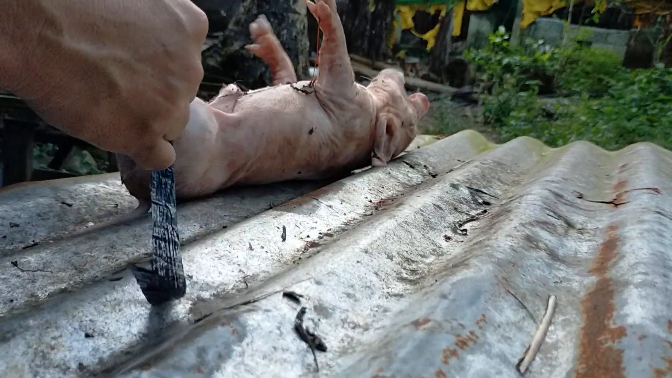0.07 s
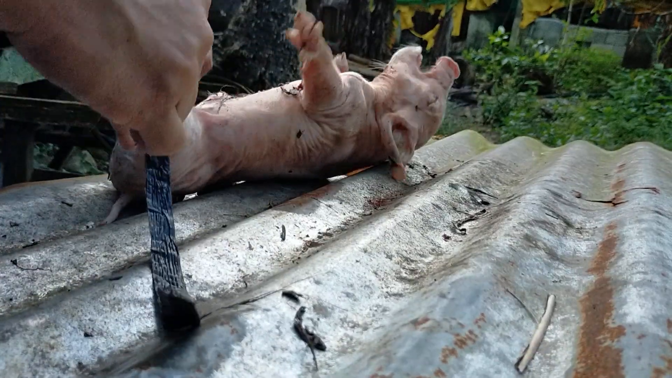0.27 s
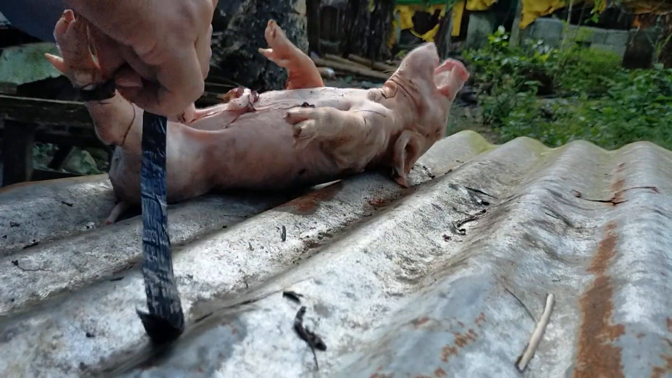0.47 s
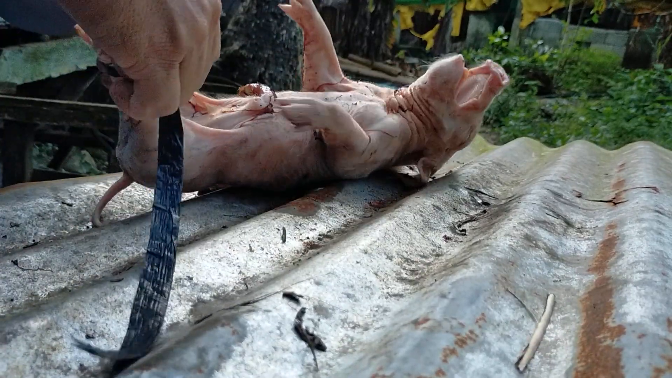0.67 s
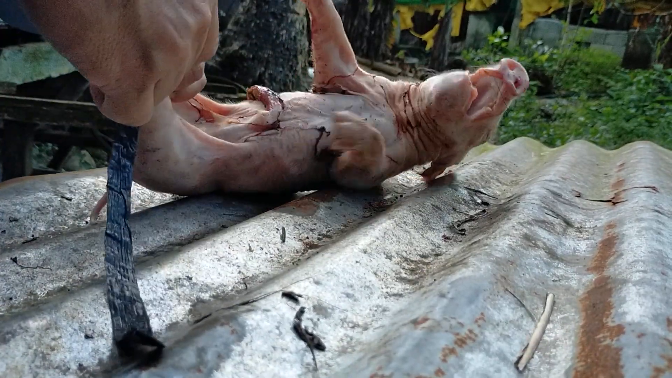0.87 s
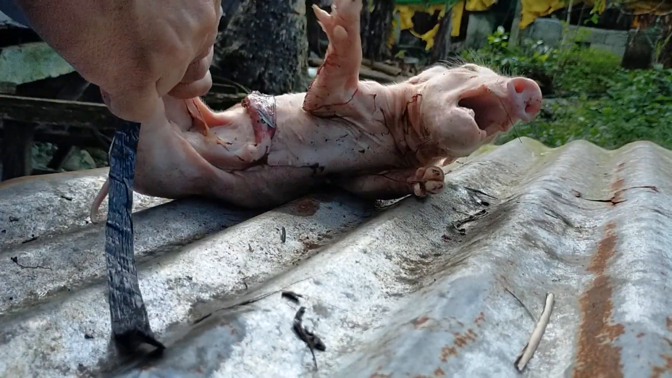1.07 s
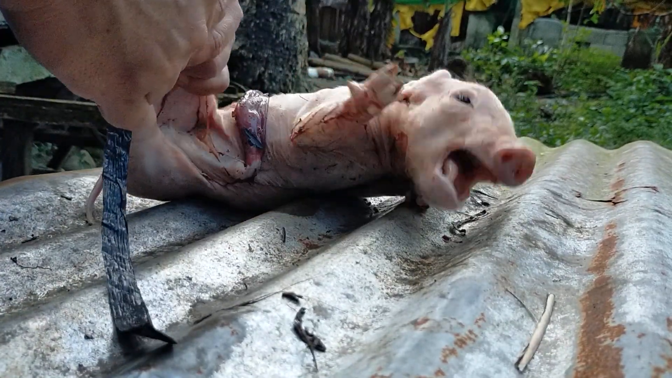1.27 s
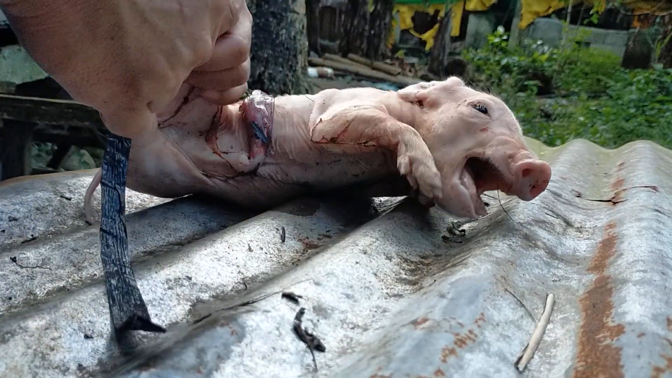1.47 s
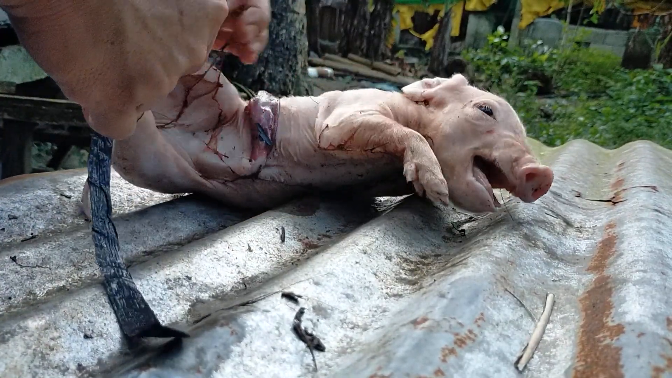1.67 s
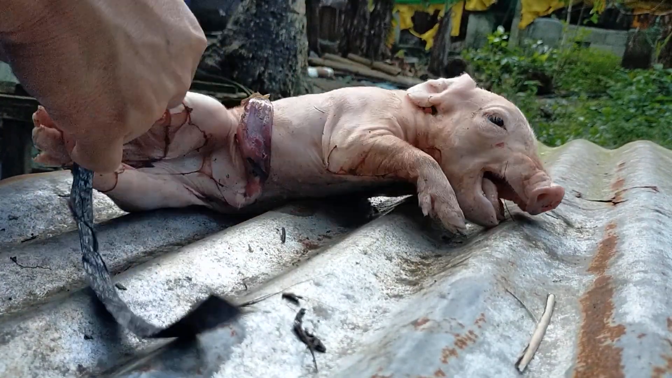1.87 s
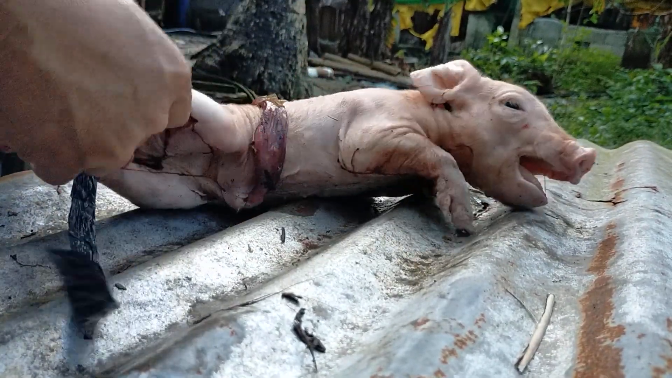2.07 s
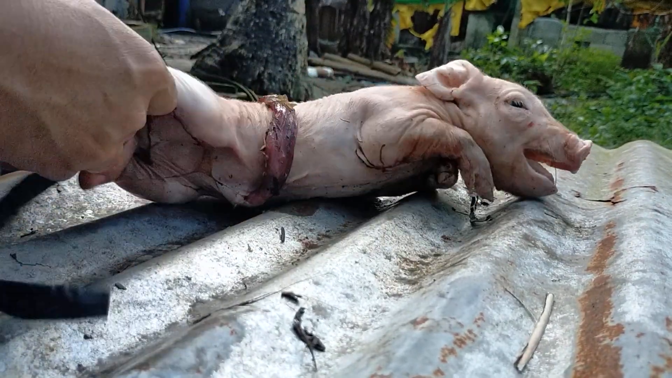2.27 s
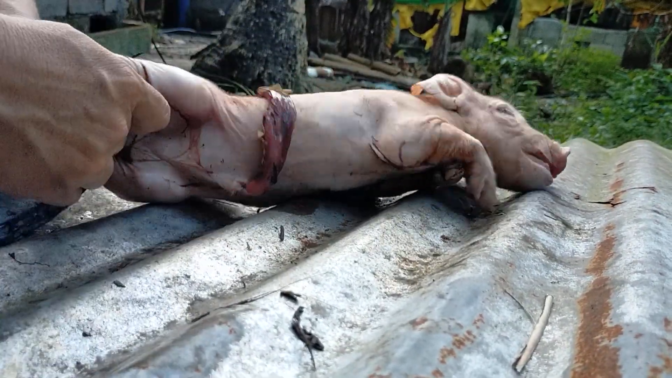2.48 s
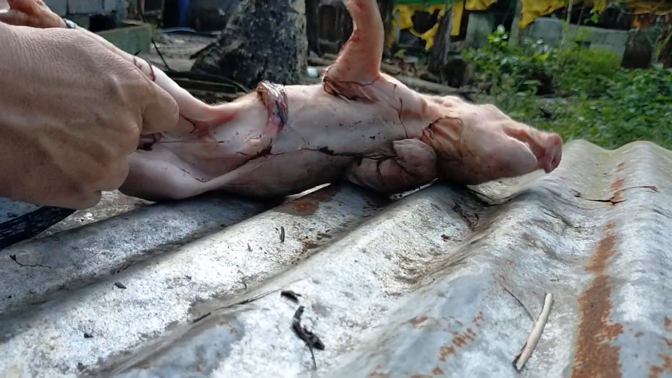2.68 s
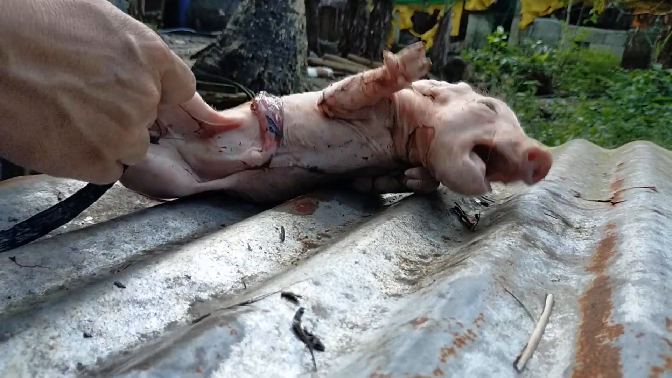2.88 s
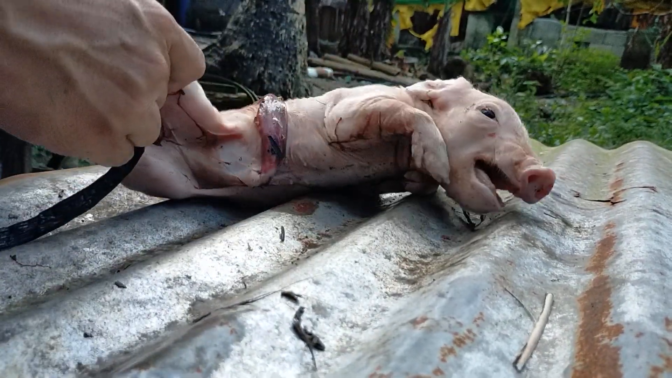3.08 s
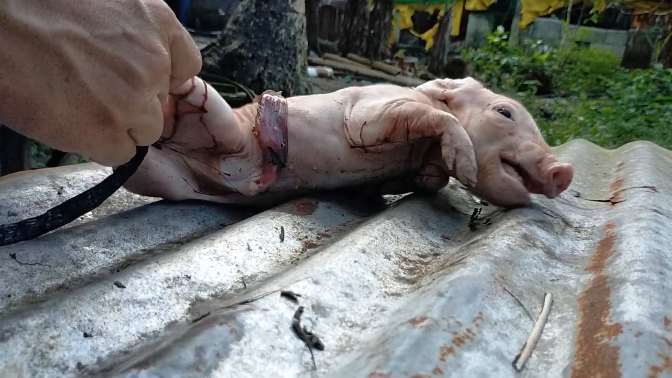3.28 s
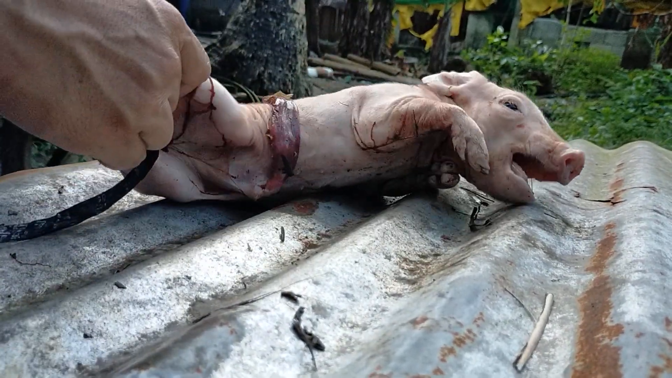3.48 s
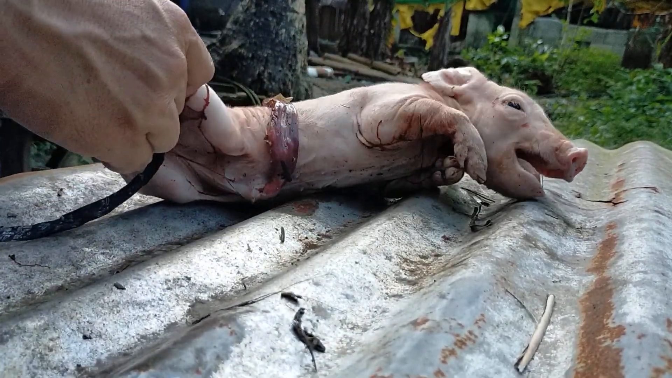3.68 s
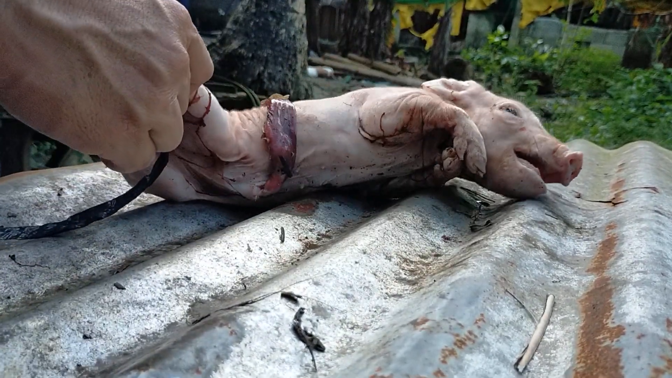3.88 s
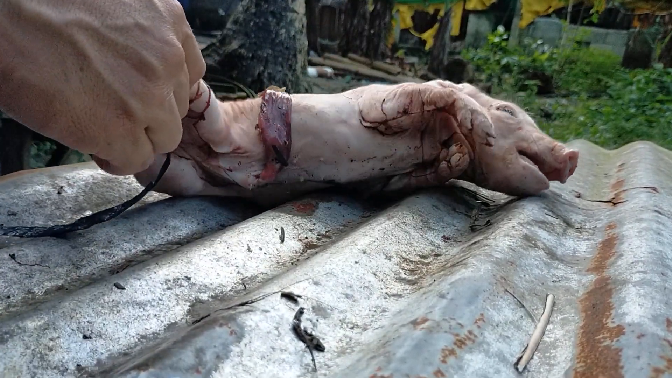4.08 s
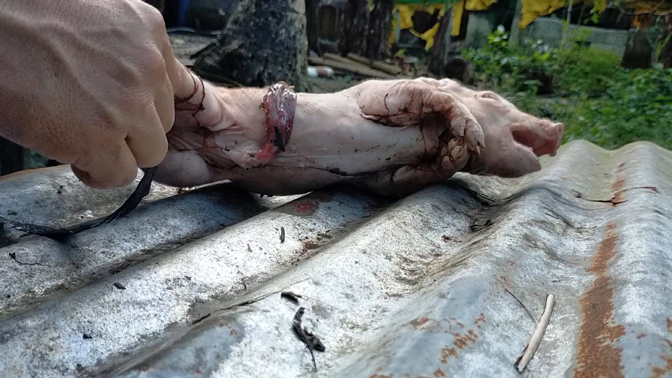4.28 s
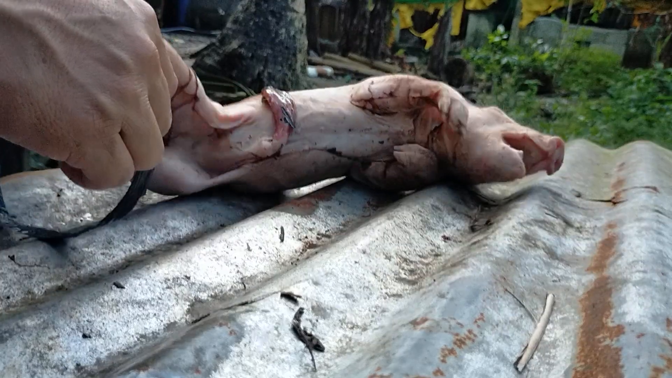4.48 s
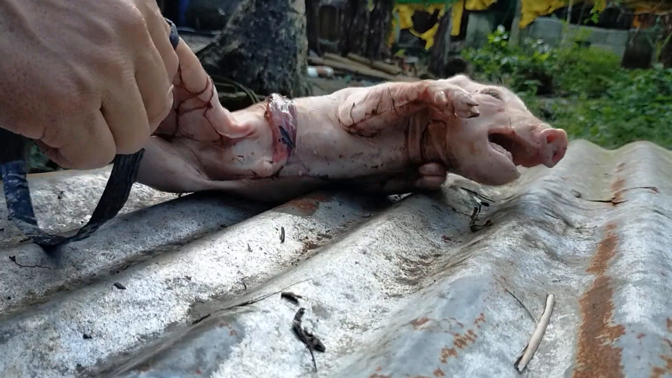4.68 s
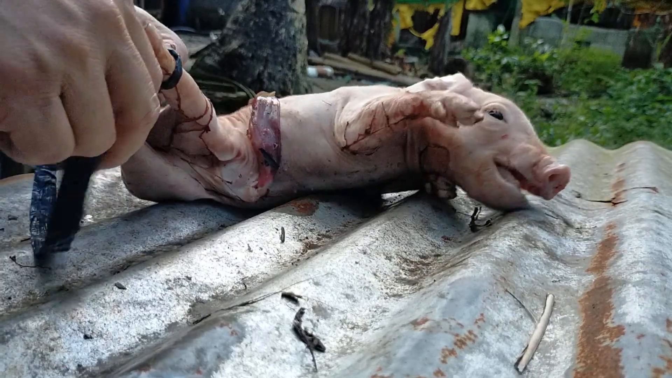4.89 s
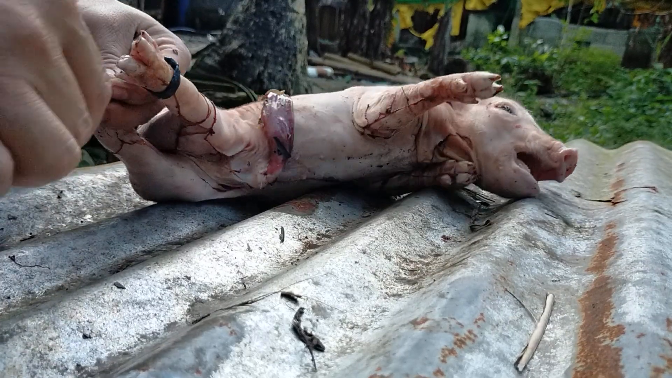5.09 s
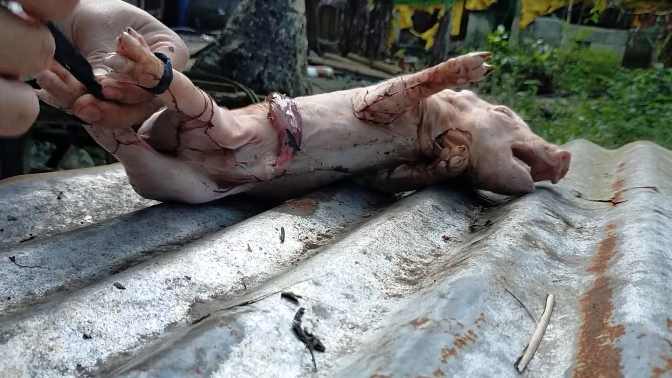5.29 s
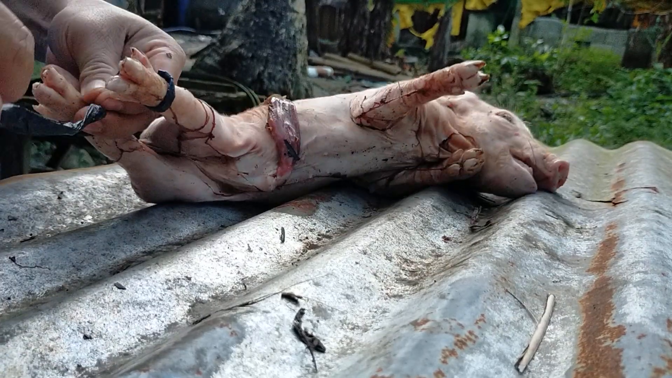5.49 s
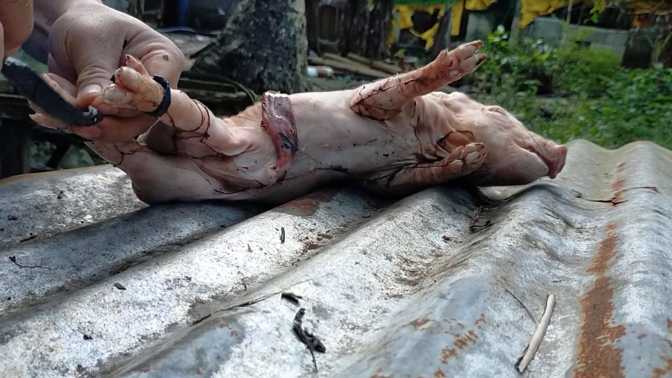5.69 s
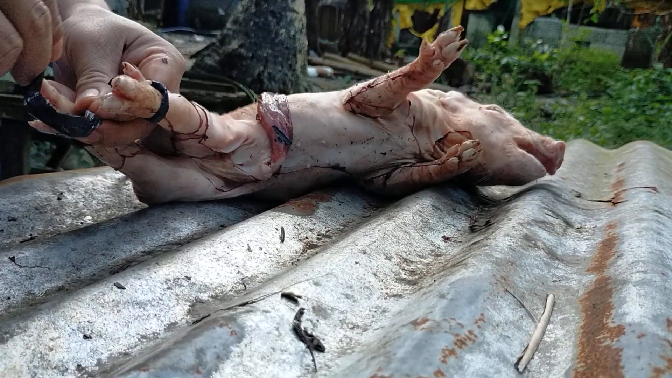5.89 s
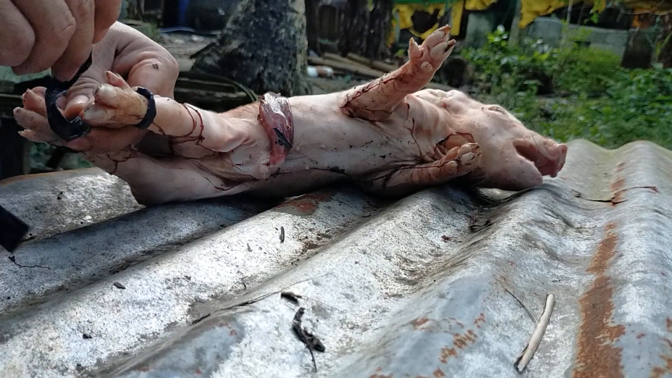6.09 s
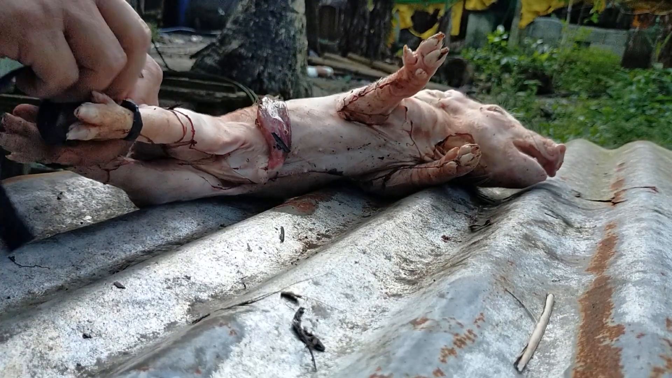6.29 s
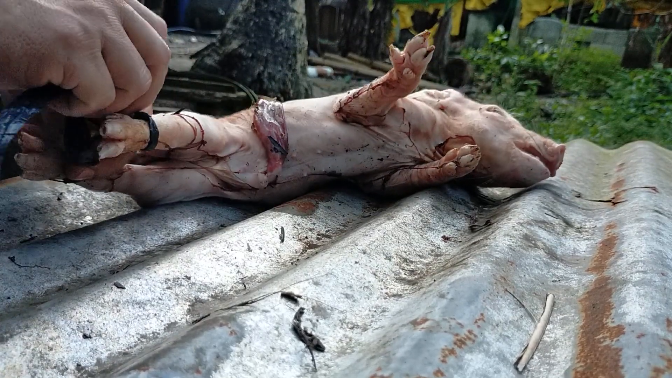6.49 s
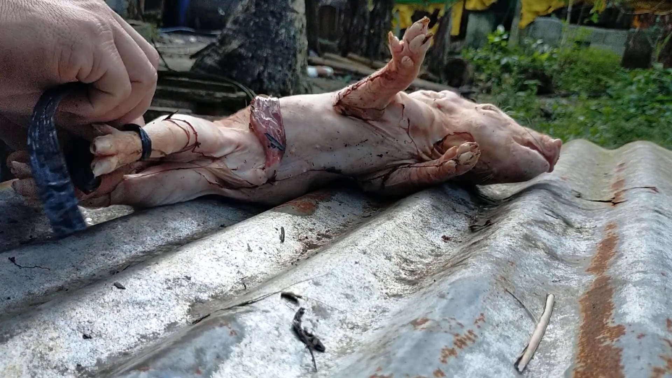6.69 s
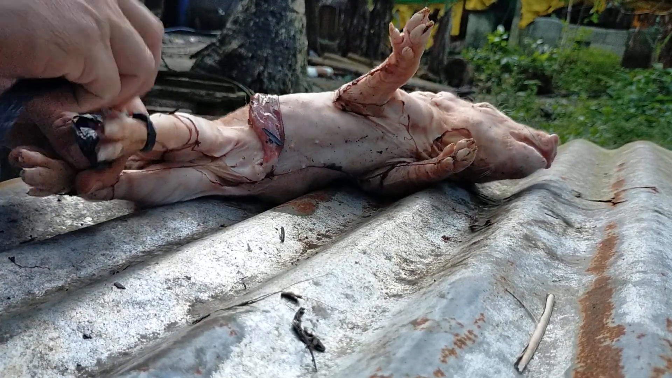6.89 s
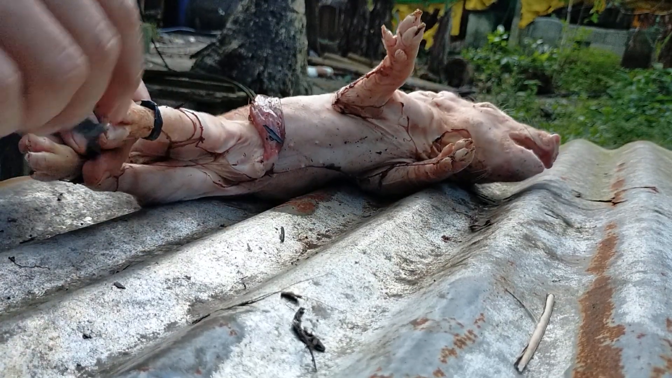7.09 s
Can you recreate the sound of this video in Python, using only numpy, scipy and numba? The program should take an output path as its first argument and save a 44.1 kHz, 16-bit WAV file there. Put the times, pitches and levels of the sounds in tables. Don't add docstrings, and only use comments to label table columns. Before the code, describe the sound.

Very close to the microphone outdoors, a small piglet screams in short repeated bursts, each starting as a low creak, rising to a nasal piercing squeal and sometimes breaking into harsh hiss. Breathy gasps fall between. Dull thumps on a corrugated metal sheet and crisp tape crackles accompany the struggle. Later squeals are quieter and tired. Insects and light wind stay faint.

```python
import sys
import numpy as np
from scipy import signal
from scipy.fft import rfft, irfft
from scipy.io import wavfile
from scipy.ndimage import uniform_filter1d
from numba import njit

SR = 44100
rng = np.random.default_rng(int(sys.argv[2]) if len(sys.argv) > 2 else 0)


def master_out(mix):
    frames = np.transpose(np.atleast_2d(mix))
    ceiling = np.clip(frames, -1, 1)
    pcm = np.round(ceiling * 32767).astype(np.int16)
    wavfile.write(sys.argv[1], SR, pcm)


def voltage_ratio(decibels):
    exponent = np.asarray(decibels, float) / 20
    return 10 ** exponent


N = 314874


def rms_one(x):
    return x / np.sqrt(np.mean(x ** 2) + 1e-20)


def filtered(x, order, hz, kind="low"):
    return signal.sosfilt(signal.butter(order, hz, kind, fs=SR, output="sos"), x)


def in_time(rows):
    s, *columns = np.transpose(rows)
    return [np.interp(np.arange(N) / SR, s, column) for column in columns]


def drift(rate_hz):
    r = np.exp(-2 * np.pi * rate_hz / SR)
    return rms_one(signal.lfilter([1], [1, -2 * r, r * r], rng.standard_normal(N + SR))[SR:])


@njit
def glide(x, cosine, r):
    y = np.zeros(len(x))
    for i in range(2, len(x)):
        drive = (1 - r[i] ** 2) / 2 * (x[i] - x[i - 2])
        y[i] = drive + 2 * r[i] * cosine[i] * y[i - 1] - r[i] ** 2 * y[i - 2]
    return y


def resonance(x, hz, width_hz):
    one = np.ones(N)
    return glide(x, one * np.cos(2 * np.pi * hz / SR), one * np.exp(-np.pi * width_hz / SR))


def modes(x, table, shift_hz=0):
    total = 0
    for hz, width_hz, db in table:
        once = resonance(x, hz + shift_hz, width_hz)
        total = total + voltage_ratio(db) * resonance(once, hz + shift_hz, 2 * width_hz)
    return total


def evened(x, span_s=0.024):
    size = int(span_s * SR)
    power = uniform_filter1d(uniform_filter1d(x ** 2, size), size)
    return x / np.sqrt(power + 1e-14)


# time in seconds, slaps per second, throat resonance in Hz, level in dB,
# roughness 0-1.
FADING = [(-.01, 96, 1760, -26, 0.48), (.07, 95, 2010, -48, 0.51), (.11, 95, 2170, -59, .6)]
LONG = [(.338, 102.8, 1907, -33.5, 0.45), (0.411, 107.8, 1836, -26.5, 0.095),
        (.46, 137.5, 1876, -14.5, 0.016), (.546, 195.4, 2025, -15, 0.11), (.614, 193.4, 2145, -19, 0.35),
        (.683, 183.6, 2170, -21.5, 0.35), (.75, 191.8, 2200, -13, 0.37), (.795, 215.2, 2100, -16, .25),
        (.815, 230, 2000, -19, 0.27)]
BREAKING = [(1.185, 85.24, 1814, -34.5, 0.17), (1.247, 93.05, 1800, -21, .15),
            (1.314, 162.8, 2035, -15, 0.035), (1.35, 192.4, 2170, -18, 0.19),
            (1.38, 200.3, 2170, -22.5, 0.59), (1.49, 221.5, 2418, -25.5, .7),
            (1.534, 187.2, 2262, -16.5, 0.32), (1.565, 169.7, 1947, -26, 0.11), (1.6, 150.4, 2000, -78, .7)]
HOARSE = [(1.872, 77.8, 1770, -41.5, .4), (1.939, 98.23, 1744, -24, .18), (2.01, 128, 1764, -19, .1),
          (2.06, 180.3, 2170, -16.5, .28), (2.11, 245.3, 2313, -22.5, .78), (2.229, 230, 2120, -31, .89),
          (2.359, 238.2, 2330, -29, .7), (2.408, 173.7, 2195, -22.5, .3), (2.434, 140, 1710, -28, .18)]
SHORT = [(2.695, 97.26, 1750, -41, 0.34), (2.77, 76.7, 1902, -27, .2), (2.814, 137.3, 2012, -18, 0.088),
         (2.876, 151.1, 2018, -16.5, .15), (2.939, 209.4, 2160, -18, 0.39), (2.97, 180, 2050, -12.5, 0.097),
         (3.0, 156.3, 2146, -46, 0.58), (3.03, 149.4, 2150, -76, .8)]
PEAKING = [(3.289, 62.7, 1260, -44.5, .15), (3.364, 87.95, 1436, -27.5, .2), (3.42, 103.8, 1636, -25.5, .2),
           (3.52, 115.5, 1843, -24, .15), (3.56, 127, 1938, -19, 0.058), (3.595, 160.1, 2100, -8, 0.014),
           (3.636, 114.4, 1831, -28.5, .1), (3.671, 103, 2120, -45, .8), (3.735, 119.1, 2113, -62.5, 0.96)]
SHRILL = [(4.068, 65, 1498, -43, .15), (4.21, 115.1, 1761, -21.5, 0.099), (4.3, 109.7, 1830, -22.5, 0.11),
          (4.349, 164.2, 2205, -14, 0.058), (4.42, 218.7, 2616, -20, 0.64), (4.5, 230, 2789, -25.5, 0.78),
          (4.52, 167.3, 2490, -5.5, 0.33), (4.545, 218.8, 1994, -27, 0.091), (4.62, 148.8, 2020, -89, .8)]
CREAKY = [(4.91, 74.93, 496.6, -70, .7), (4.97, 79.7, 1250, -47.5, .75), (5.0, 80.15, 1479, -37, .5),
          (5.011, 80, 1546, -25.5, .08), (5.09, 103.8, 1619, -23.5, .13), (5.161, 97.13, 1710, -29.5, .5),
          (5.214, 107.1, 1827, -23.5, 0.16), (5.28, 118, 1892, -33.5, .55), (5.39, 113, 2540, -54.5, 0.97)]
TIRED = [(5.836, 76.4, 1420, -28.5, .2), (5.903, 103.3, 1557, -26, .1), (5.977, 86.66, 1549, -28.5, 0.21),
         (6.05, 120.4, 1850, -30, 0.27), (6.123, 111.1, 1700, -34.5, .3), (6.197, 79.26, 1950, -34.5, 0.18),
         (6.286, 72.9, 1897, -51.5, 0.92)]
LAST = [(6.849, 58.94, 1374, -40, 0.44), (6.928, 81.9, 1510, -34.5, 0.14), (6.995, 121.7, 1760, -35.5, .15),
        (7.043, 125, 1809, -30.5, .15), (7.06, 146.5, 1970, -22.5, 0.085), (7.101, 145.4, 2012, -28, .12),
        (7.2, 144.1, 2030, -22, .15)]
SQUEALS = [
    FADING,
    LONG,
    BREAKING,
    HOARSE,
    SHORT,
    PEAKING,
    SHRILL,
    CREAKY,
    TIRED,
    LAST,
]
# open second resonance over first, second resonance in dB, mouth hiss in dB,
# teeth hiss in dB, chest grunt in dB.
COLOURS = [(2.9, 6.5, -4, -7, -46), (2.02, -5.5, 5.5, -2, -41), (1.636, -3, 6.5, 3, -44),
           (1.693, -0.5, 2.5, 2, -38), (2.045, -5.5, 3, 0, -46.5), (1.915, -0.5, -4.5, -3, -43),
           (1.976, -1.5, 1, -5, -44.5), (2.194, -4, -25, -6.5, -41.5), (2.112, -4, -3, -5.5, -44),
           (1.97, -3, -4, -8, -44)]
# start in seconds, end in seconds, level in dB, throat resonance in Hz, chest grunt in dB.
GASPS = [
    (.818, 0.896, -43, 2300, -47.5),
    (0.996, 1.17, -48, 2196, -45),
    (5.606, 5.833, -53, 2870, -44),
    (6.29, 6.515, -50.5, 2740, -44.5),
    (6.672, 6.799, -59, 1498, -52.5),
]


def breaths():
    slaps_per_s, rough, fade_db, ratio, second_db, hiss_db = 65, .85, 8.5, 0.47, 3, -4.5
    calls = [*zip(SQUEALS, COLOURS)]
    for start, end, db, hz, chest_db in GASPS:
        curve = [(start, slaps_per_s, hz, db, rough), (end, slaps_per_s, hz, db - fade_db, rough)]
        calls.append((curve, (ratio, second_db, hiss_db, hiss_db, chest_db)))
    calls.sort(key=lambda call: call[0][0][0])
    spans = np.array([(curve[0][0], curve[-1][0], *colour) for curve, colour in calls])
    current = np.maximum(np.searchsorted(spans[:, 0], np.arange(N) / SR) - 1, 0)
    return in_time(sorted(row for curve, _ in calls for row in curve)), spans[current].T


def throat(opening, open_hz, level_db, rough):
    tight_hz, slack_hz, tight_db, widen_hz_per_db, chaos_widen_hz = 88, 268.5, -15.5, 23, 230
    second_shut_hz, chaos_sag_hz, knee_db = 2220, 302, -20.5
    chaos = np.clip(2 * rough - .6, 0, 1)
    loud_db = np.maximum(level_db - knee_db, 0)
    second_hz = second_shut_hz + np.clip(opening, 0, 1) * (open_hz - chaos_sag_hz * chaos - second_shut_hz)
    width_hz = np.clip(tight_hz + widen_hz_per_db * (tight_db - level_db), tight_hz, slack_hz)
    width_hz = width_hz + chaos_widen_hz * chaos
    shut_db = -24.5 * np.exp(-(opening / 0.27) ** 2)
    second_db = -7.5 - loud_db + 8.5 * rough + shut_db
    mouth_db = -26.5 + 31 * rough
    teeth_db = -20 + 25.5 * rough - 0.92 * loud_db
    return second_hz, width_hz, second_db, mouth_db, teeth_db


def folds(per_s, rough, shimmer_db=1.9, puff_s=.0014):
    jitter = (.012 + .3 * rough ** 2) * np.clip(drift(60), -2, 2)
    phase = np.cumsum(per_s * (1 + jitter)) / SR
    regular = np.diff(np.floor(phase), prepend=0) > 0
    stray = rng.random(N) < 1400 * rough ** 3 / SR
    size_db = shimmer_db * np.sqrt(100 / per_s) * rng.standard_normal(N)
    slaps = (regular | stray) * voltage_ratio(size_db) + 1e-18
    puff = signal.lfilter([1], [1, -np.exp(-1 / (puff_s * SR))], slaps)
    return slaps, puff, regular + 1e-18


# centre in Hz, width in Hz, level in dB.
SNOUT_MODES = [(2300, 350, -7), (1950, 400, -10), (1200, 500, -26)]


def first_resonance(source, hz, width_hz, wobble, locked):
    first = resonance(resonance(source, hz * wobble, width_hz), hz, 150 + 3 * width_hz)
    snout = (width_hz / 300) ** 1.8 * modes(source, SNOUT_MODES)
    first = evened(resonance(first + snout, hz + 250, 2000))
    turn = 2 * np.pi * np.cumsum(hz * wobble) / SR
    tone = np.sin(turn) + .22 * np.sin(2 * turn)
    return (first + 1.7 * locked * tone) / np.sqrt(1 + 1.5 * locked ** 2)


def second_resonance(source, puff, hz, width_hz, wobble, rough):
    driven = source + 0.14 * puff * rng.standard_normal(N)
    second = resonance(driven, hz * wobble, 260 + .5 * width_hz + 900 * rough)
    second = evened(resonance(resonance(second, hz, 700 + 1200 * rough), hz, 1800))
    turbulence = (puff + 0.9) * rng.standard_normal(N)
    scream = 0.72 * rough * evened(modes(turbulence, [(3300, 1100, 0), (4550, 290, 0.01)]))
    return (second + scream) / np.sqrt(1 + rough ** 2)


# centre in Hz, width in Hz, level in dB.
MOUTH_MODES = [(6400, 900, 0.95), (7850, 740, 1)]
# centre in Hz, width in Hz, level in dB.
TEETH_MODES = [(8400, 4000, 3), (11010, 900, 0.5), (13070, 2700, -4), (14330, 3300, 6)]


def mouth_and_teeth(slaps, puff, first_hz, rough):
    hiss = 0.22 * slaps + 0.27 * (puff + 0.12 + .5 * rough) * rng.standard_normal(N)
    hiss = filtered(hiss, 6, 5250, "high")
    mouth, teeth = 0, 0
    for mode in MOUTH_MODES:
        shift_hz = 0.13 * (first_hz - 2100) + 150 * drift(5.5)
        mouth = mouth + voltage_ratio(3.5 * drift(6.5)) * modes(hiss, [mode], shift_hz)
    for mode in TEETH_MODES:
        teeth = teeth + voltage_ratio(4.9 * drift(5)) * modes(hiss, [mode], 250 * drift(5.7))
    return evened(mouth), evened(teeth)


# centre in Hz, width in Hz, level in dB.
CHEST_MODES = [(216, 77, -1.5), (289, 120, 2), (447.7, 61, 4), (519, 100, 4), (770, 200, 2.5)]


def chest_grunt(beats, per_s, rough, locked, chest_db):
    chest = evened(modes(beats + (.012 + .2 * rough ** 2) * rng.standard_normal(N), CHEST_MODES))
    fast_loss_db = 12.5 * np.clip(per_s / 100.4 - 1, 0, .6) / 0.83
    return voltage_ratio(chest_db - fast_loss_db + locked + 2.5 * rough * drift(7.3)) * chest


# centre in seconds, half length in seconds, width in Hz.
WHISTLES = [
    (.5, .07, 68),
    (3.595, .035, 48),
    (5.77, .06, 130),
    (6.42, .07, 130),
    (7.115, .08, 35),
]


def piglet():
    opening_s, attack_s, release_s, grunt_swell_s = 0.16, 0.009, .01, 0.033
    curves, current = breaths()
    per_s, first_hz, first_db, rough = curves
    start_s, end_s, ratio, second_db, mouth_db, teeth_db, chest_db = current
    rough = np.clip(rough, 0, 1)
    t = np.arange(N) / SR
    flowing = np.clip((t - start_s) / attack_s, 0, 1) * np.clip((end_s - t) / release_s, 0, 1)
    voiced_s = np.cumsum(np.clip(1.6 - 2 * rough, 0, 1)) / SR
    opening = np.where(ratio < 1, 1, (voiced_s - np.interp(start_s, t, voiced_s)) / opening_s)
    second_hz, width_hz, *law_db = throat(opening, ratio * first_hz, first_db, rough)
    second_db, mouth_db, teeth_db = second_db + law_db[0], mouth_db + law_db[1], teeth_db + law_db[2]
    for s, half_s, narrow_hz in WHISTLES:
        width_hz = width_hz + np.clip(2 - 2 * np.abs(t - s) / half_s, 0, 1) * (narrow_hz - width_hz)
    locked = np.clip((75 - width_hz) / 40, 0, 1)

    slaps, puff, beats = folds(per_s, rough)
    wobble = 1 + 0.004 * drift(49)
    breath = (.04 + .07 * rough) * (puff + 4 * rough ** 2 + .25) * rng.standard_normal(N)
    source = slaps + breath
    first = first_resonance(source, first_hz, width_hz, wobble, locked)
    second = second_resonance(source, puff, second_hz, width_hz, wobble, rough)
    mouth, teeth = mouth_and_teeth(slaps, puff, first_hz, rough)
    upper = voltage_ratio(second_db + 3.5 * drift(6.7)) * second + voltage_ratio(mouth_db) * mouth + voltage_ratio(teeth_db) * teeth
    chest = chest_grunt(beats, per_s, rough, locked, chest_db)
    swell = np.clip(np.minimum(t - start_s, end_s - t) / grunt_swell_s, 0, 1)
    return flowing * (voltage_ratio(first_db) * (first + upper) + swell * chest)


def sheet_ring(voice, hz=2020, t60_s=.22, db=-33):
    return voltage_ratio(db) * resonance(voice, hz, np.log(1000) / np.pi / t60_s) * 10


def yard(voice, t60_s=0.34, db=-18):
    t = np.arange(SR // 2) / SR
    scatter = rng.standard_normal(len(t)) * voltage_ratio(-60 * t / t60_s) * (t > .004)
    tail = signal.lfilter([.4], [1, -.6], scatter / np.linalg.norm(scatter))
    return voltage_ratio(db) * signal.fftconvolve(voice, tail)[:N]


# time in seconds, peak in dB, pitch in Hz.
THUMPS = [(0.306, -10.5, 343), (0.33, -50, 430), (2.312, -29.5, 200.4), (2.456, -26.5, 290),
          (2.465, -22, 360), (2.589, -21.5, 318.4), (2.602, -32, 325.2), (2.765, -22.5, 286.1),
          (2.789, -55, 80.67), (3.284, -34, 385), (4.309, -27.5, 189.7), (4.672, -44, 188.3),
          (4.762, -42.5, 105), (6.129, -42, 195.5), (6.31, -36, 520), (6.682, -35.5, 205.4),
          (6.701, -32.5, 202)]


def thumps(rattle_t60_s=0.3):
    out = np.zeros(N)
    rumble = rms_one(filtered(rng.standard_normal(N), 1, [60, 600], "band"))
    rumble = rms_one(filtered(rumble, 2, 1800))
    for s, db, hz in THUMPS:
        i = round(s * SR)
        t = np.arange(min(SR // 3, N - i)) / SR
        swing = np.sin(2 * np.pi * hz * t) * (1 - np.exp(-t / 0.0007)) * np.exp(-(t / 0.007) ** 2)
        rattle = 0.33 * rumble[i:i + len(t)] * (1 - np.exp(-t / 0.0034)) * voltage_ratio(-60 * t / rattle_t60_s)
        out[i:i + len(t)] += voltage_ratio(db) * (swing + rattle)
    return out


# time in seconds, peak in dB.
TAPE_SNAPS = [(0.3102, -21), (0.3296, -8.5), (0.3416, -7), (0.4524, -8), (1.0006, -21), (1.0774, -23),
              (1.2161, -23), (1.7544, -30), (1.7644, -29), (3.9998, -29), (4.7551, -26), (4.8623, -22.5),
              (4.9801, -19.5), (5.4694, -25), (5.5777, -18), (5.7468, -28), (6.0656, -13), (6.2312, -22),
              (6.3185, -26.5), (6.552, -24), (6.6418, -66), (6.78, -21.5), (6.8778, -12), (6.8834, -16),
              (6.9012, -13), (7.0579, -24), (7.0958, -13)]


def tape(ticks_per_s=14, tick_db=-34.0, fade_s=0.0017):
    s, db = np.transpose(TAPE_SNAPS)
    ticks = rng.random(N) < ticks_per_s / SR
    clicks = ticks * voltage_ratio(tick_db + 3.5 * rng.standard_normal(N)) + 1e-18
    clicks[(s * SR).astype(int)] = voltage_ratio(db)
    burst = signal.lfilter([1], [1, -np.exp(-1 / (fade_s * SR))], clicks) * rng.standard_normal(N)
    bright = modes(filtered(burst, 8, 16600), TEETH_MODES)
    body = modes(burst, [(5270, 1000, 0.000032)])
    return 0.3 * bright + 0.25 * body


# centre in Hz, width in Hz, level in dB.
INSECTS = [(7416, 170, -58), (10470, 1100, -60), (14500, 2200, -61.5)]


def insects():
    songs = 0
    for hz, width_hz, db in INSECTS:
        song = rms_one(modes(rng.standard_normal(N), [(hz, width_hz, 0)]))
        songs = songs + voltage_ratio(db + 2.0 * drift(50)) * song
    return songs


# time in seconds, level in dB.
WIND = [
    (0.0, -49),
    (0.38, -54),
    (0.67, -62.5),
    (7.14, -52),
]


def wind():
    rumble = rms_one(modes(rng.standard_normal(N), [(45, 70, 5), (105, 130, -12.0)]))
    return voltage_ratio(in_time(WIND)[0] + 3.4 * drift(1.7)) * rumble


# frequency in Hz, level in dB.
AIR_SPECTRUM = [(15, 4), (25, -5.5), (317, -13), (1260, -16), (2000, -15), (5730, -30), (7310, -4.5),
                (8360, -24.5), (10400, -21), (12200, -23), (16000, -24)]


def air_noise(db=-51.5):
    hz = np.maximum(np.fft.rfftfreq(N, 1 / SR), 1)
    table_hz, table_db = np.transpose(AIR_SPECTRUM)
    colour = voltage_ratio(np.interp(np.log(hz), np.log(table_hz), table_db))
    return voltage_ratio(db + 0.71 * drift(2.6)) * rms_one(irfft(rfft(rng.standard_normal(N)) * colour, N))


def scene():
    voice = piglet()
    steady = voice + sheet_ring(voice) + yard(voice) + insects() + wind() + air_noise()
    top_hz = 16150
    steady = signal.sosfilt(signal.cheby2(18, 50, top_hz, fs=SR, output="sos"), steady)
    return (steady + thumps() + tape())[None]


def top_cut(x):
    return signal.sosfilt(signal.butter(12, 16820, fs=SR, output="sos"), x)


def record(dry):
    mix = 0.62 * np.tanh(dry / 0.6)
    return top_cut(mix)


dry = scene()
out = record(dry)
master_out(out)
```